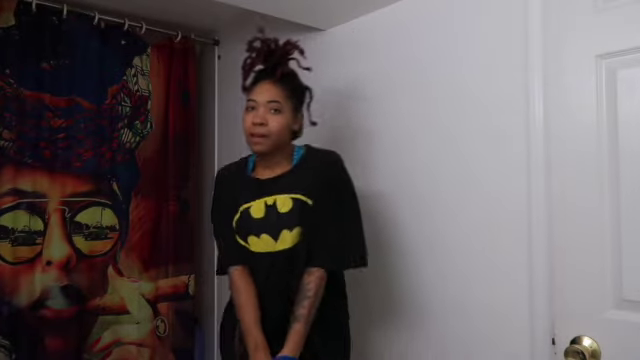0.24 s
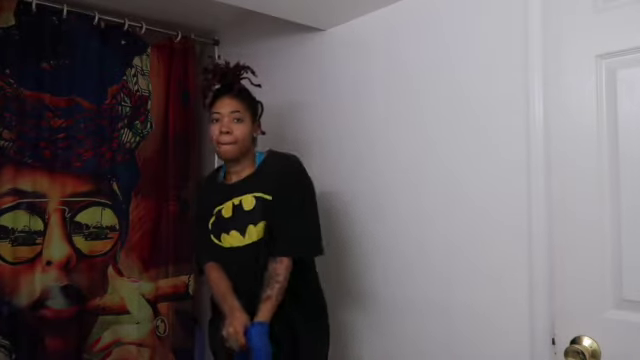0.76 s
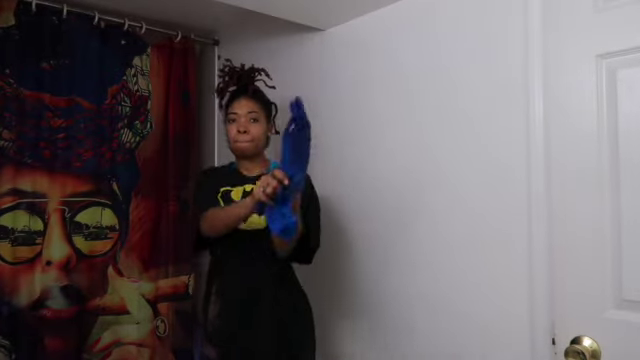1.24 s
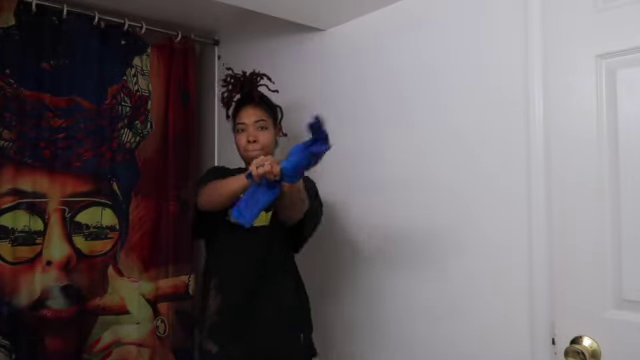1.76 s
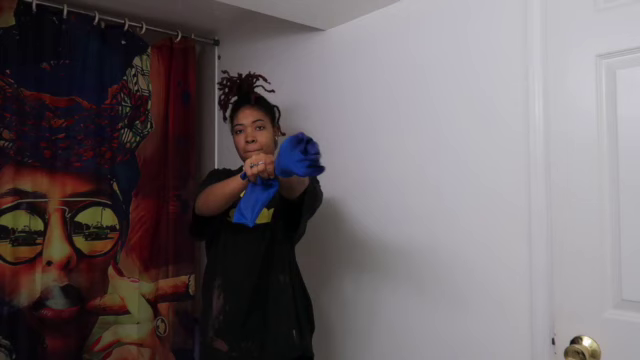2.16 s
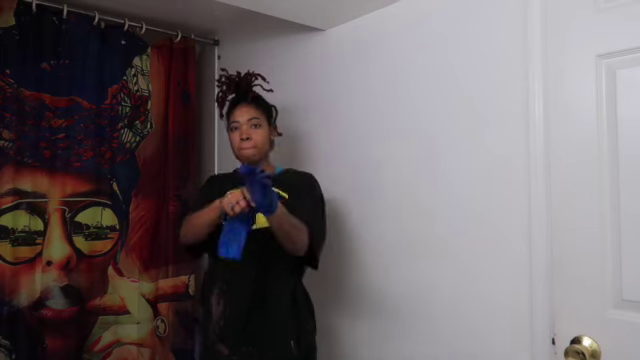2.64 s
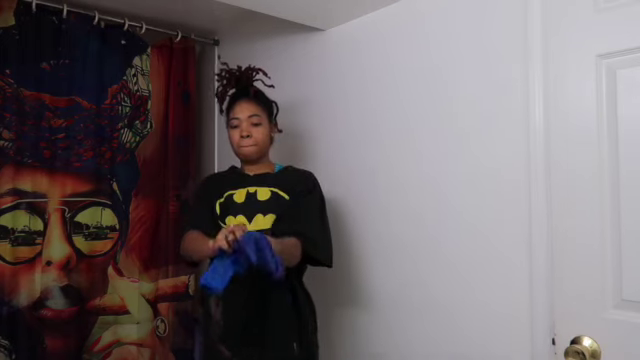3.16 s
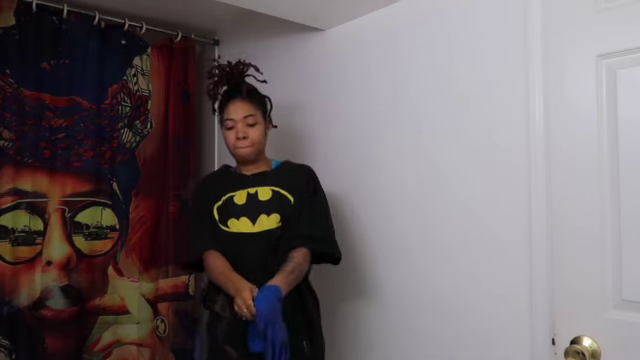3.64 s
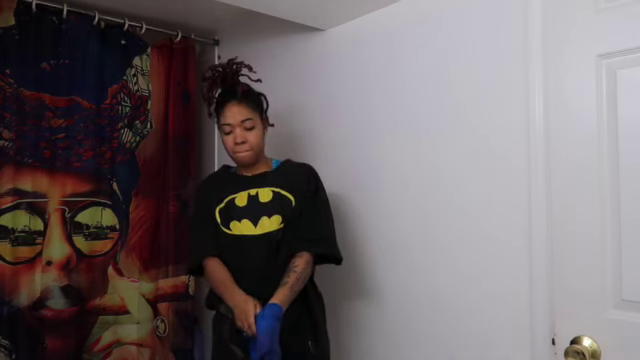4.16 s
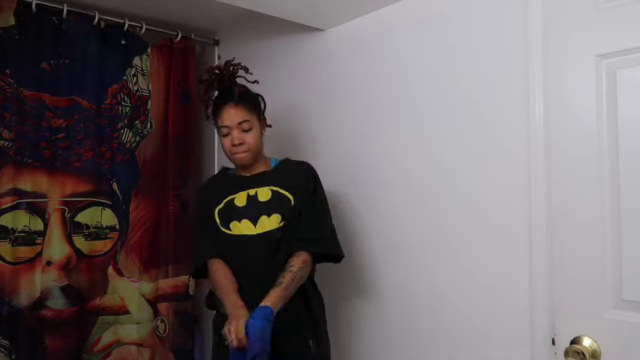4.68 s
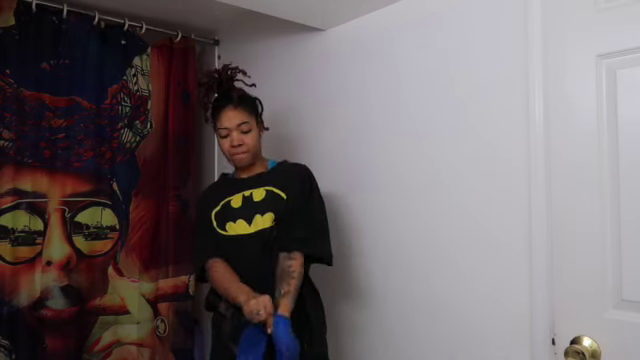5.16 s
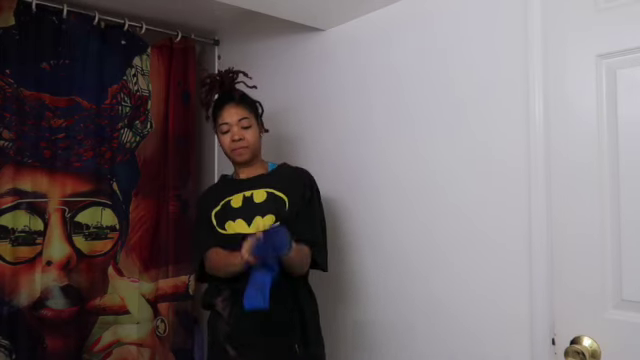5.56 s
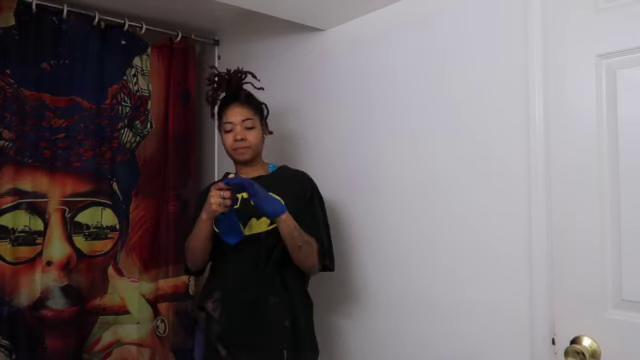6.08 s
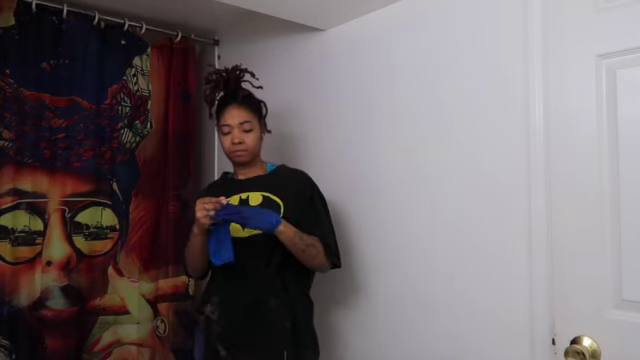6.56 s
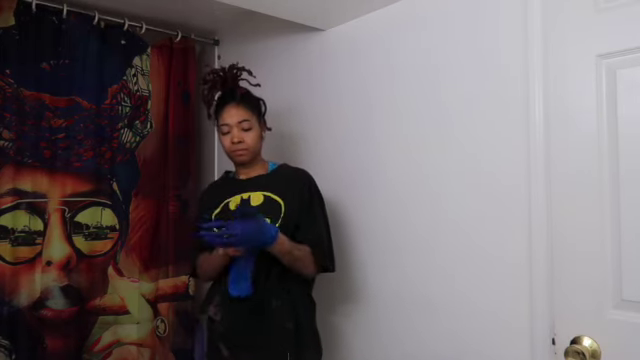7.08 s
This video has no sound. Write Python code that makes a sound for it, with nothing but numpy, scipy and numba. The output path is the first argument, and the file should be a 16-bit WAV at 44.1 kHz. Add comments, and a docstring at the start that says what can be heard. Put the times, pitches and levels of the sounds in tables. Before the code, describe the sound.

Thin rubber gloves tugged and snapped in a small hard bathroom, sharp cracks at about two and six and a half seconds, soft rustles between.

```python
"""A bare, hard-walled bathroom: thin rubber gloves are tugged onto a hand in front of a small camera.
Slaps of the cuff are noise bursts that ring air pockets; the creeping film is a crackle of tiny slips.
Both go through bathroom echoes. A vehicle outside is two wavering sines, the air is shaped noise,
and the camera adds a thin whine and ticks; its gain control ducks when a snap overloads it."""
import sys
import numpy as np
from scipy import signal
from scipy.fft import rfft, irfft
from scipy.io import wavfile
from scipy.ndimage import uniform_filter1d
from numba import njit

SR = 44100
rng = np.random.default_rng(int(sys.argv[2]) if len(sys.argv) > 2 else 0)


def gain_from_decibels(decibels):
    """Convert decibel values to linear amplitude factors."""
    exponent = np.asarray(decibels, float) / 20
    return 10 ** exponent


def output_pcm(signal):
    """Save a mono or channel-first signal as 16-bit PCM at the path in sys.argv[1].

    Samples are clipped to [-1, 1] before scaling.
    """
    pcm = np.clip(np.atleast_2d(signal).T, -1, 1) * 32767
    wavfile.write(sys.argv[1], SR, np.round(pcm).astype(np.int16))


N = 322812  # length [samples]


def noise(size=N):
    """White noise."""
    return rng.standard_normal(size)


def level(x, db):
    """Set the rms level."""
    return x * gain_from_decibels(db) / np.sqrt(np.mean(x ** 2))


def curve(table, edge=None):
    """Columns of a timed table, one value per sample; edge is the value outside its times."""
    s, *columns = np.transpose(table)
    return [np.interp(np.arange(N) / SR, s, column, edge, edge) for column in columns]


def resonance(x, hz, width_hz):
    """One resonance."""
    return signal.lfilter(*signal.iirpeak(hz, hz / width_hz, SR), x)


def between(x, lo_hz, hi_hz, order):
    """A flat band with steep edges."""
    return signal.sosfilt(signal.butter(order, [lo_hz, hi_hz], "bandpass", fs=SR, output="sos"), x)


def colour(x, points):
    """Shape a spectrum by (frequency [Hz], level [dB]) points, joined along log frequency."""
    hz, db = np.transpose(points)
    size = x.shape[-1]
    f = np.arange(size // 2 + 1) * SR / size + 1  # 1 Hz up, so that the log exists
    return irfft(rfft(x) * gain_from_decibels(np.interp(np.log(f), np.log(hz), db)), size)


def walk(rate):
    """Random values held for 1 / rate seconds, then smoothed twice into a wandering curve."""
    hold = int(SR / rate)
    steps = np.repeat(noise(N // hold + 1), hold)
    return 1.3 * uniform_filter1d(uniform_filter1d(steps, hold), hold)[:N]


def causal(power):
    """The minimum-phase response that has this power spectrum: its energy comes as early as possible."""
    cepstrum = irfft(np.log(power + 1e-12) / 2)
    half = len(cepstrum) // 2
    cepstrum[1:half] *= 2
    cepstrum[half + 1:] = 0
    return irfft(np.exp(rfft(cepstrum)))[:half]


# the cuff or a finger snaps back; body and crack are relative to the air pocket:
# (time [s], level [dB], air pocket [Hz], body [dB], crack [dB])
SNAP_HITS = [(.5, -18, 1620, 9.5, -5), (.764, -26.5, 3140, -38, -27), (.948, -27, 1228, 5, 2.5),
             (0.971, -23, 5440, -13, -18), (1.086, -17.5, 7400, -3, -8), (2.065, 7, 2900, 1.5, 9.5),
             (2.1, 15, 2000, -12.5, -6.5), (2.102, 8.5, 3290, -17, 3), (2.469, -17, 2480, 3, 8),
             (2.762, -20.5, 2530, -3.5, -0.5), (3.497, -17, 4650, -3, 0.5), (3.806, -24, 3530, 3, 7),
             (3.921, -29, 3400, -10, 7), (3.974, -14, 1766, -3, 8.5), (4.815, -11, 3420, -3.5, -6.5),
             (4.984, -13, 2860, -5, -8), (5.129, -26.5, 2950, 6, 5.5), (5.34, -27, 3050, -11, 5),
             (5.498, -12, 1750, -7, 3), (5.585, -23, 2470, 3.5, 8.5), (5.81, -31.5, 1230, 8.5, -38),
             (6.224, -30, 800, -14, -1.5), (6.389, -2, 2610, 2.5, -9.5), (6.659, 5, 1793, -1, -10),
             (7.109, -36.5, 2280, 7.5, -3.5), (7.233, -27.5, 1240, -26, -10)]
# the film drags and lets go in a flutter:
# (time [s], level [dB], air pocket [Hz], crack [dB], decay [ms])
DRAG_SLIPS = [(1.06, -21.5, 1920, 5.5, 8.9), (1.409, -21, 3580, -1, 12.7), (1.428, -21.5, 3737, -1, 4.4),
              (1.561, -22, 2540, -4, 17), (1.583, -22.5, 2614, 1.5, 5.3), (1.653, -24, 2660, -3.5, 4.8),
              (2.404, -20.5, 1820, -0.5, 15), (2.802, -25, 2500, 2.5, 8.2), (3.193, -30, 2210, 0, 6.5),
              (3.275, -35, 3094, 9.5, 9.5), (3.461, -25.5, 2520, 10, 15), (4.572, -28, 1100, -4, 12),
              (4.638, -28.5, 1250, 12, 12), (4.777, -25.5, 1240, -3, 24), (4.841, -16.5, 1400, -15, 7.4),
              (5.545, -16.5, 2500, -.5, 7.6), (5.874, -28.5, 2660, 6, 56), (5.925, -16.5, 2600, 6, 12.5)]
# low thuds under some of the snaps: (time [s], level [dB], air pocket [Hz])
THUD_HITS = [(.502, -13, 312), (2.066, -13, 207), (3.976, -18.5, 266), (6.389, -16, 292), (6.66, -8.5, 580)]


def slap_list():
    """All slaps as (time, level, air pocket, body, crack, flutter decay [ms], first strike at level 0 dB)."""
    slaps = [(*row, 1.5, 4.9) for row in SNAP_HITS]
    for s, db, hz, crack_db, decay_ms in DRAG_SLIPS:
        slaps.append((s, db, hz, crack_db - 4, crack_db, decay_ms, 2))
    slaps += [(*row, -4.5, -11.5, 4.1, 3.9) for row in THUD_HITS]
    return slaps


def snaps():
    """A first strike and a flutter of rubber ring the trapped air, thump below it and crack above it."""
    out = np.zeros(N + 8192)
    t = np.arange(6144) / SR
    f = np.arange(1025) * SR / 2048 + 1
    lead = int(.012 * SR)
    strike_db_per_db = 0.31  # harder slaps strike more cleanly
    for s, db, hz, body_db, crack_db, decay_ms, strike in slap_list():
        slap = 0.19 * noise(len(t)) * gain_from_decibels(3.65 * rng.exponential(size=len(t)))
        # a faint noise swells for a few milliseconds before each strike
        lead_in = .15 * np.exp((t[:lead] - t[lead]) / .004)
        flutter = np.exp(-t[:-lead] / (decay_ms / 1000))
        slap *= np.r_[lead_in, flutter]
        slap[lead] = strike * gain_from_decibels(strike_db_per_db * db)
        # power spectra: a resonant peak, a shelf below it, a broad band above it
        below = 1 / (1 + (f / (1.2 * hz)) ** 14)
        pocket = below / (1 + ((f / hz - hz / f) / .3) ** 2) ** 1.3
        body = below / (1 + (500 / f) ** 2)
        crack = 1 / (1 + (1.57 * hz / f) ** 6) / (1 + (f / 5500) ** 2) / (1 + (f / 9500) ** 6)
        parts = ((0, pocket), (body_db, body), (crack_db, crack))
        power = sum(gain_from_decibels(2 * part_db) * part / part.sum() for part_db, part in parts)
        sound = signal.fftconvolve(slap, causal(power))
        sound *= gain_from_decibels(db) * np.sqrt(power.sum() / np.sum(sound ** 2))
        start = int(s * SR) - lead
        out[start:start + len(sound)] += sound
    return out[:N]


# film creeping over skin: (time [s], level [dB])
RUSTLE_LEVEL = [(0.0, -50), (.33, -59), (.65, -51), (1.02, -50.5), (1.5, -49.5), (1.89, -54.5),
                (2.34, -65.5), (2.63, -62), (3.2, -63.5), (3.9, -51), (4.36, -61), (4.6, -52.5),
                (5.26, -53), (5.83, -55.5), (6.03, -83), (6.24, -51), (6.52, -84), (7.07, -63), (7.32, -56)]


def rustle():
    """Thousands of tiny slips, some larger, come in uneven gusts; their crisp top comes and goes."""
    db, = curve(RUSTLE_LEVEL)
    slips_per_s, crinkles_per_s = 3000, 24
    slips = (rng.random(N) < slips_per_s / SR) * noise() * gain_from_decibels(2.5 * rng.exponential(size=N))
    slips = slips * gain_from_decibels(walk(25.03))
    # about 24 times a second a fold crinkles: a few milliseconds of louder noise
    folds = (rng.random(N) < crinkles_per_s / SR) * gain_from_decibels(3.0 * rng.exponential(size=N))
    fold_fade = signal.lfilter([1], [1, -np.exp(-1 / (.003 * SR))], folds)
    slips = level(slips, 0) + level(fold_fade * noise(), -11)
    body = level(resonance(slips, 1852, 2700), -11.5) + level(resonance(slips, 500, 1200), -17.0)
    top = level(between(slips, 3400, 10500, order=2), -17.5)
    return gain_from_decibels(db) * (body + gain_from_decibels(3.0 * walk(2.4)) * top)


# tail of the bathroom: (band centre [Hz], time to fade by 60 dB [s])
ROOM_FADE = [(150, 0.65), (350, 0.26), (700, 0.36), (1500, 0.31), (3000, 0.25), (6000, 0.24), (11000, 0.16)]
# first echoes off single walls: (delay [ms], level [dB])
WALL_ECHOES = [(3.2, -8), (8.5, -7), (11.5, -8), (17.5, -11), (27, -12), (36, -13)]


def echoes():
    """From one place of the hands: direct sound, single walls, then dense echoes that fade band by band."""
    t = np.arange(SR // 2) / SR
    tail = 0
    for hz, t60 in ROOM_FADE:
        dense = resonance(noise((2, len(t))), hz, 0.94 * hz)
        tail = tail + level(dense, 10 * np.log10(hz / 1000)) * gain_from_decibels(-60 * t / t60)
    # the room lingers on one note
    ring = level(resonance(noise((2, len(t))), 1764, 270), -4)
    tail = tail + ring * gain_from_decibels(-60 * t / 0.4)
    out = gain_from_decibels(-36.5) * tail * np.clip(t / .007, 0, 1)  # the tail builds up over 7 ms
    out[:, 0] = [1, .7]  # direct sound
    for ms, db in WALL_ECHOES:
        at = int(ms * rng.uniform(.9, 1.1) * SR / 1000)
        out[:, at] += gain_from_decibels(db) * rng.choice([-1, 1], 2)
    return out


# difference between the two microphone ports: (frequency [Hz], filter gain of the side [dB])
PORT_DIFFERENCE = [(100, -18), (380, -18.5), (700, -22), (1300, -17), (2400, -14.5), (4400, -4),
                   (8000, 2.5), (15000, 20)]


def room(x):
    """The hands keep moving, so the echo pattern is renewed; the ports differ most in the treble."""
    poses = 24
    out, step = np.zeros((2, N + SR)), N // poses + 1
    for i in range(0, N, step):
        part = signal.fftconvolve(x[None, i:i + step], echoes(), axes=1)
        out[:, i:i + part.shape[1]] += part
    # two spaced ports differ by a small lag: their difference is a quarter cycle off
    side = signal.hilbert(out[1, :N]).imag
    return np.array([out[0, :N], colour(side, PORT_DIFFERENCE)])


# tone of the microphone: (frequency [Hz], gain [dB])
MIC_TONE = [(60, -2), (500, 1), (1200, 3.5), (1800, 2), (3300, 3), (4200, -1.5), (8000, -13), (11000, -14),
            (16000, -25)]


def microphone(x):
    """The microphone lifts the middle of the spectrum and dulls the treble."""
    return colour(x, MIC_TONE)


# vehicle outside, a tone that sags at the end: (time [s], frequency [Hz], level [dB])
HUM_TONE = [(0.0, 95.2, -54), (.43, 96.8, -53.5), (.7, 94.9, -51), (1.0, 95.6, -57), (1.17, 96.3, -54),
            (1.36, 95, -58), (1.6, 96.2, -48), (2.06, 95.1, -52.5), (2.4, 97.5, -52), (2.65, 98, -62.5),
            (3.03, 98, -44.5), (3.36, 96.6, -45), (3.5, 95.9, -52), (3.82, 91.5, -46), (3.92, 83.8, -50.5),
            (4.04, 82.9, -49), (4.3, 82, -73)]
# its short higher note swells and fades: (time [s], frequency [Hz], level [dB])
REV_TONE = [(3.55, 121.9, -60), (3.739, 130.2, -46), (3.92, 126.1, -50), (4.0, 130, -55)]


def vehicle():
    """Two slightly unsteady low sine tones, alike at both ports."""
    out = 0
    for table in (HUM_TONE, REV_TONE):
        hz = curve(table)[0]
        db = curve(table, edge=-89)[1]
        db = uniform_filter1d(db, 2000) + 1.9 * walk(5)
        out = out + np.sqrt(2) * gain_from_decibels(db) * np.sin(2 * np.pi * np.cumsum(hz) / SR)
    return out


# spectrum of the background common to both ports: (frequency [Hz], relative density [dB per Hz])
AIR_MID_SPECTRUM = [(15, -40), (25, -9.5), (102, -1.5), (160, -8.5), (448, -10), (569, -26), (632, -16),
                    (1130, -22.5), (1330, -22), (2780, -25), (3730, -25), (11300, -43.5), (14000, -82.5)]
# spectrum of the background that differs between them: (frequency [Hz], relative density [dB per Hz])
AIR_SIDE_SPECTRUM = [(15, -63), (25, -38), (113, -5), (374, -0.5), (612, -8), (3230, -18.5), (3500, -19.5),
                     (4300, -16), (7240, -29.5), (12500, -31), (16200, -67.5), (22000, -120)]


def air():
    """Noise shaped into rumble and hiss that swell gently; the bass flickers by itself."""
    out = []
    for points, db in ((AIR_MID_SPECTRUM, -50.5), (AIR_SIDE_SPECTRUM, -54)):
        hiss = level(colour(noise(), points), db)
        low = signal.sosfilt(signal.butter(2, 160, fs=SR, output="sos"), hiss)
        out.append(low * gain_from_decibels(2.5 * walk(4.2)) + (hiss - low) * gain_from_decibels(0.58 * walk(4.1)))
    return np.array(out)


def camera():
    """A thin wavering whine and an uneven patter of small noise ticks, opposite in the two ports."""
    whine_hz, whine_db, ticks_per_s = 13100, -70.5, 30
    whine = gain_from_decibels(whine_db + 1.9 * walk(30)) * np.sin(2 * np.pi * whine_hz * np.arange(N) / SR)
    ticks = np.zeros(N)
    at = np.cumsum(SR / ticks_per_s * (1 + .15 * noise(240))).astype(int)
    ticks[at[at < N]] = 1
    ticks = signal.lfilter([1], [1, -.992], ticks) * gain_from_decibels(4.0 * walk(3)) * noise()
    ticks = resonance(resonance(ticks, 4300, 900), 4300, 900)
    return whine + level(ticks, -74.0)


@njit
def gain_control(peak, top, step, slew, release):
    """An overload sets the goal a fixed step down; the gain slides to it while the goal creeps back."""
    gain, g, goal = np.empty(len(peak)), 1., 1.
    for i in range(len(peak)):
        goal = step if peak[i] > top else min(1., goal * release)
        g += (goal - g) * slew
        gain[i] = g
    return gain


def scene():
    """Gloves in the room over the background; mid and side become left and right."""
    mid, side = microphone(room(snaps() + rustle())) + air()
    mid, side = mid + vehicle(), side + camera()
    return np.array([mid + side, mid - side])


def top_cut(x):
    """Nothing passes above the cut-off."""
    return signal.sosfilt(signal.butter(12, 16830, fs=SR, output="sos"), x)


def record(dry):
    """Overloads pull the gain down within milliseconds, it creeps back; peaks that outrun it clip."""
    overload, step_db, slide_s, recovery_db_per_s = 1.15, -10.5, 0.013, 6.5
    peak = np.abs(dry).max(axis=0)
    gain = gain_control(peak, overload, gain_from_decibels(step_db), 1 / (slide_s * SR), gain_from_decibels(recovery_db_per_s / SR))
    mix = np.clip(dry * gain, -1, 1)
    # steep low-pass at 16.3 kHz
    mix = signal.sosfilt(signal.ellip(6, .2, 60, 16300, fs=SR, output="sos"), mix)
    return top_cut(mix)


dry = scene()
out = record(dry)
output_pcm(out)
```